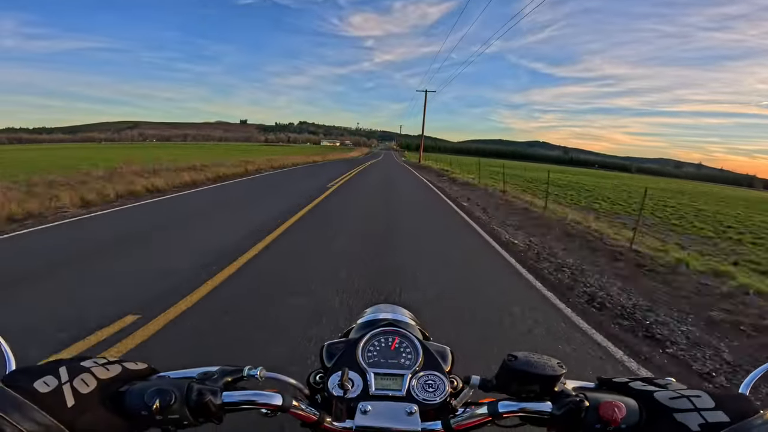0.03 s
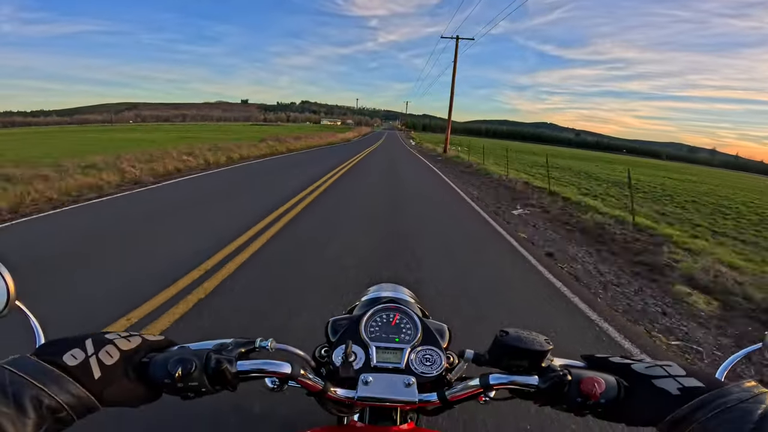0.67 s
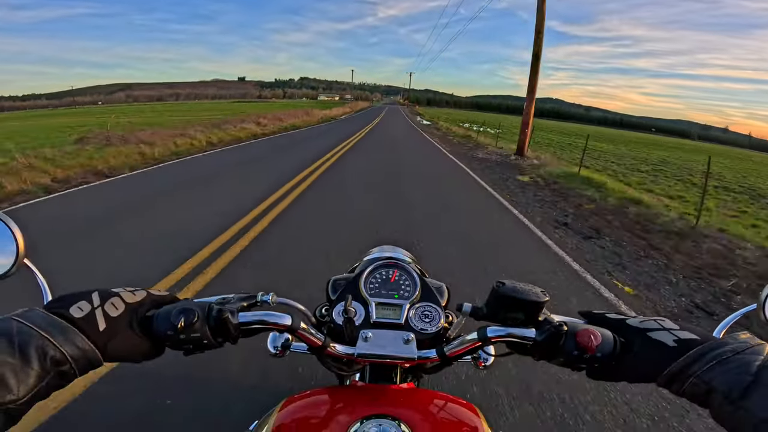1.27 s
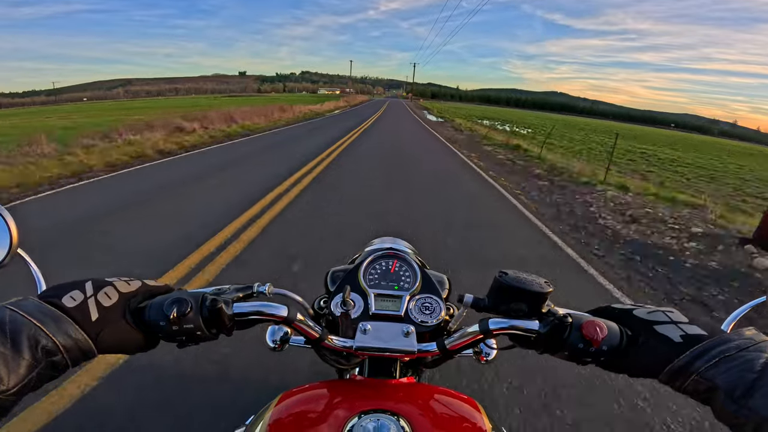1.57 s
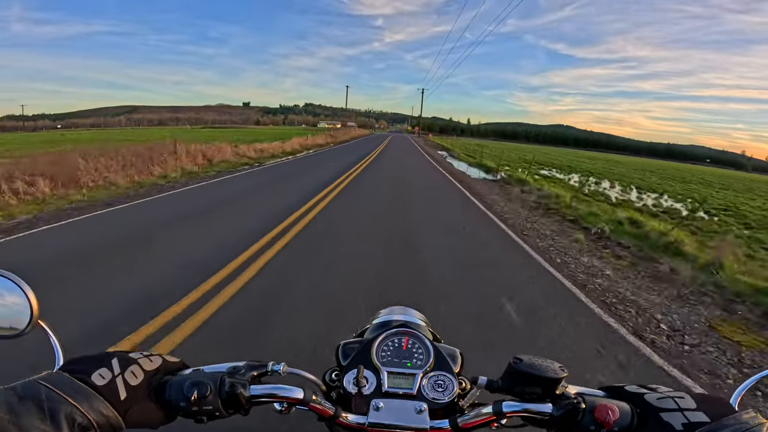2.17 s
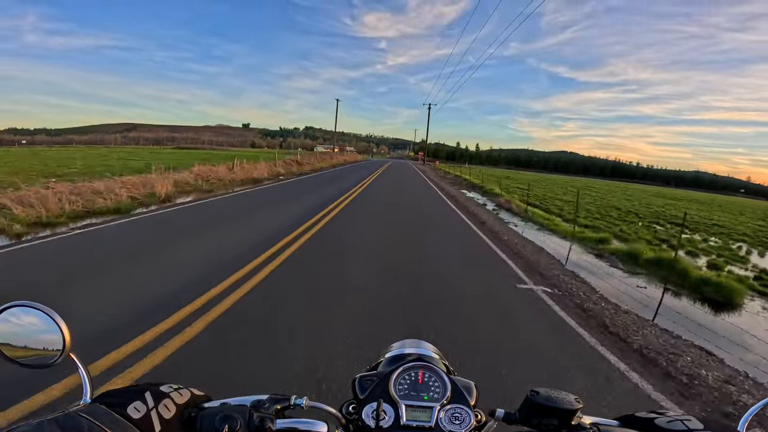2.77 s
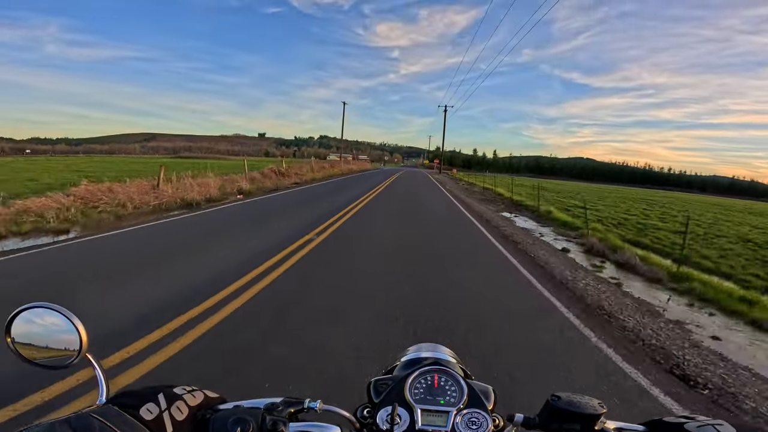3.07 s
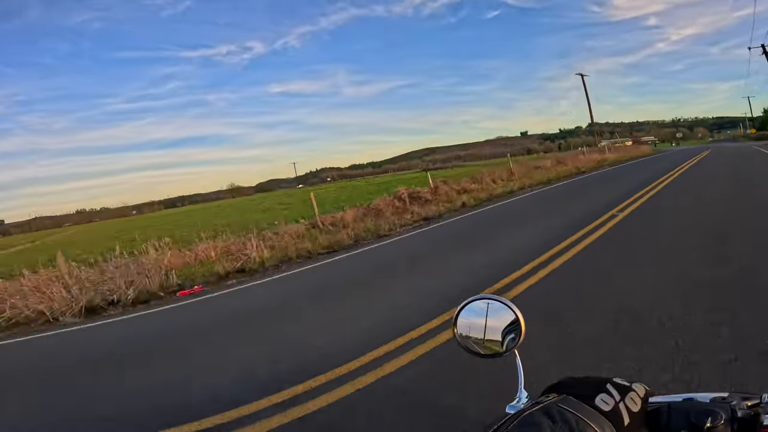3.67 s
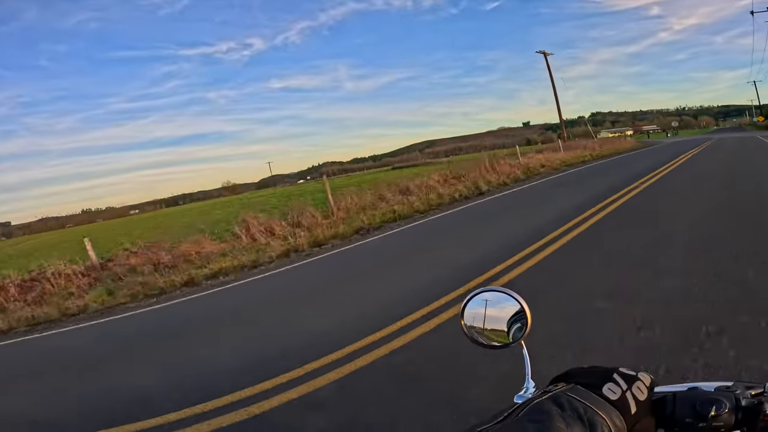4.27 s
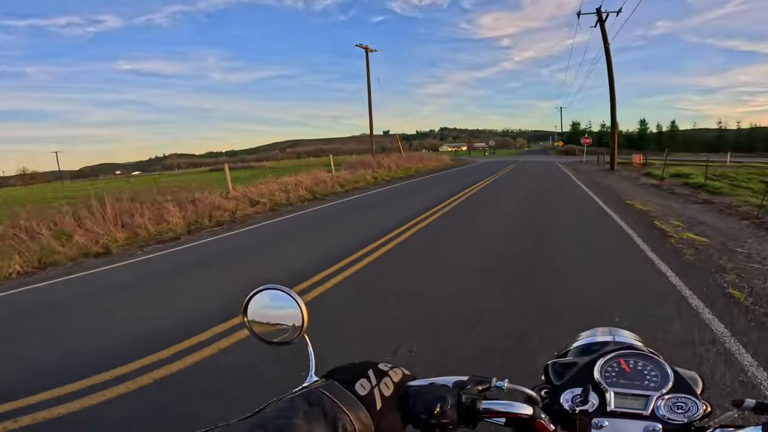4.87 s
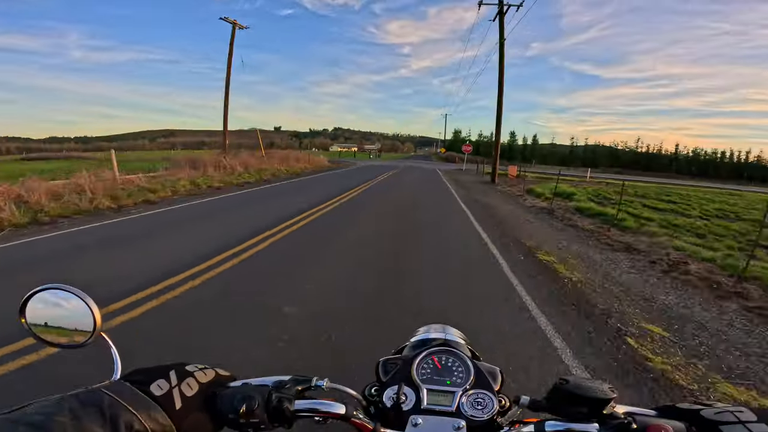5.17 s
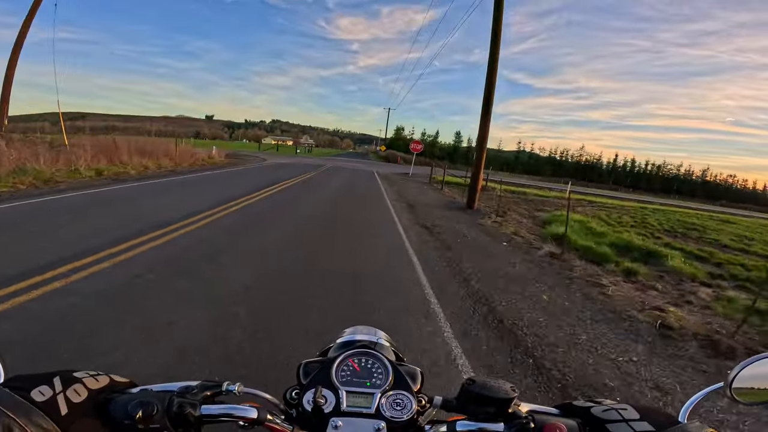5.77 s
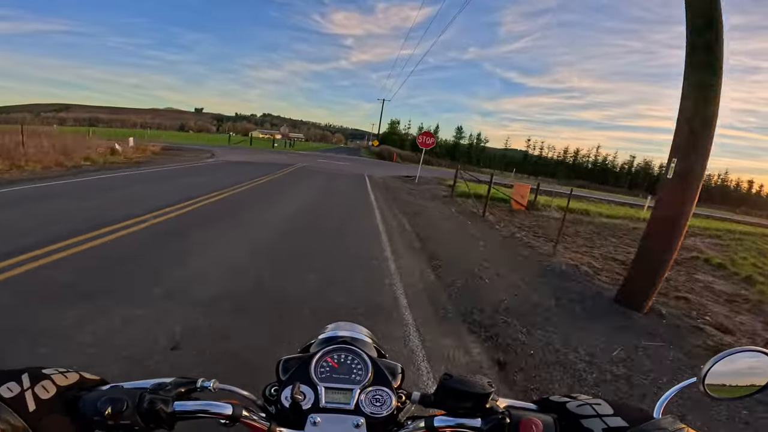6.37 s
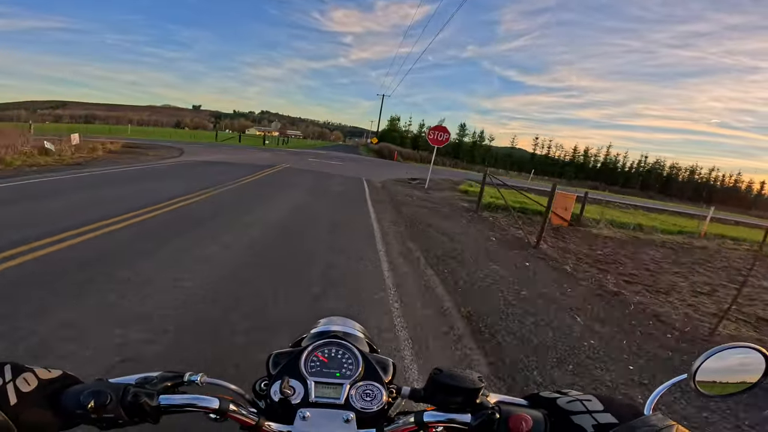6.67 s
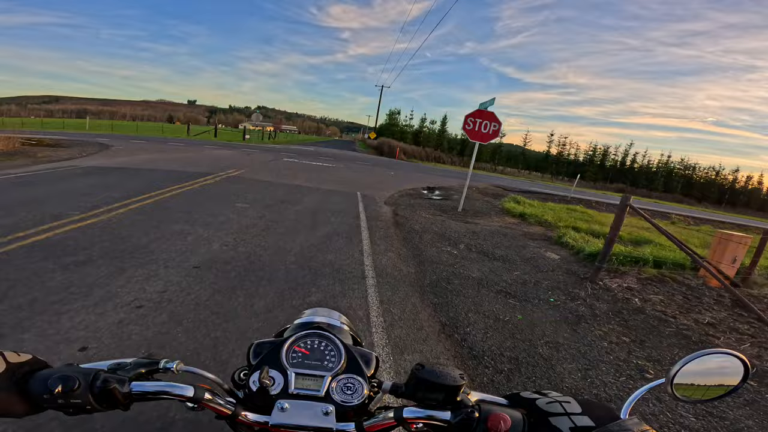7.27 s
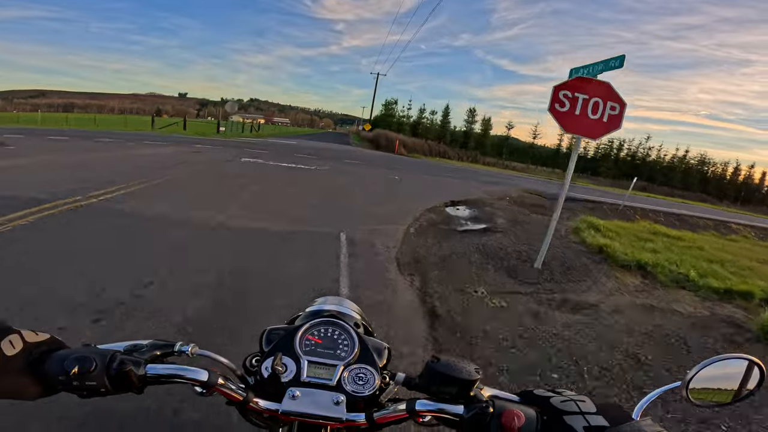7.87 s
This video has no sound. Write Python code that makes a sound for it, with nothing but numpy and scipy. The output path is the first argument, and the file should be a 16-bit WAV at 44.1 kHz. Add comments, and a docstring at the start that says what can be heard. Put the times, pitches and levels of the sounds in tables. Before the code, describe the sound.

A single-cylinder motorcycle coasts along an open road, heard from the rider's helmet under heavy, buffeting wind with faint whistles. Small touches of throttle lift the engine note at each downshift, and gears whine faintly. As the bike slows, the wind dies away and the engine falls in pitch. A lever clacks sharply, lighter clicks and a few soft exhaust pops follow, and the engine settles into a slow thumping idle.

```python
"""A single-cylinder motorcycle, heard from the rider's helmet, rolls off towards a stop sign.
At first turbulent wind buffets, rushes and whistles over the coasting engine, whose gas pulses ring
the silencer. A touch of throttle marks each downshift and meshing gears whine. The rider looks aside,
the brake rubs and the wind dies away with road speed. Then the clutch linkage scrapes, levers clack,
unburnt mixture pops in the silencer, and the engine catches into a slow thumping idle."""
import sys
import numpy as np
from scipy import signal
from scipy.io import wavfile

SR = 44100
rng = np.random.default_rng(int(sys.argv[2]) if len(sys.argv) > 2 else 0)


def unload_wav(signal):
    """Save mono or channel-first audio to the path in sys.argv[1] as 16-bit WAV at rate SR, clipped to [-1, 1]."""
    wavfile.write(
        sys.argv[1],
        SR,
        np.round(np.clip(np.atleast_2d(signal).T, -1, 1) * 32767).astype(np.int16),
    )


N = 357651
TIME = np.arange(N) / SR

# Spectra give relative level per unit bandwidth; sigma is the width of a Gaussian swell in time.
# road speed, coasting and then braking: t/s, speed/(m/s)
ROAD_SPEED = [(0, 20), (2.6, 19), (4.6, 15.5), (5.6, 12.9), (8.11, 6.6)]
# spectra of the wind's low buffeting, mid rush and high hiss: f/Hz, level/dB
BUFFET_SPECTRUM = [(15, -1), (28, -3), (50, -0.5), (90, 7.5), (150, -2.5), (250, -9), (400, -16)]
RUSH_SPECTRUM = [(120, 8.5), (220, 4), (330, 2.5), (450, -1), (580, -3.5), (720, 1), (1050, -6.5),
                 (1450, -5.5), (1900, -23), (2600, -37.5)]
HISS_SPECTRUM = [(1500, -9), (1900, 0.5), (2500, -0.5), (3200, -2.5), (4300, -8), (5200, -14),
                 (7400, -17.5), (10000, -26), (15500, -29)]
# helmet edges singing in the wind: f/Hz, bandwidth/Hz, level/dB relative to the rush
HELMET_MODES = [(780, 170, -9.5), (962.4, 31, -19.5)]
# visor whistles: f/Hz, bandwidth/Hz, relative level/dB
VISOR_MODES = [(5530, 580, -1.5), (7130, 720, -3)]
# gusts: t/s, sigma/s, rumble gain/dB, hiss gain/dB, whistle level/dB
GUSTS = [(.12, 0.14, 3, -0.5, -54), (.86, 0.08, 3.5, 2, -44), (1.12, 0.13, -6, 2.5, -47),
         (1.45, 0.079, 3, 2, -45), (1.67, 0.074, -3, 2, -43.5), (2.0, .1, 4.5, 1, -58)]
# brake disc resonances: f/Hz, bandwidth/Hz, relative level/dB
DISC_MODES = [(1648, 200, 6), (3375, 430, -7), (4750, 800, -15.5), (7000, 770, -23.5)]
# swells of a drive-train whine whose pitch falls with road speed: t/s, sigma/s, level/dB
DRIVE_WHINE_SWELLS = [(4.5, 0.16, -38), (5.25, 0.25, -49)]
# gear pairs under load: meshings per engine cycle, t/s, sigma/s, level/dB
GEAR_MESHES = [(30, 1.2, .25, -41), (30, 2.8, .12, -45), (41, 4.78, .12, -44), (48.5, 4.78, .1, -45),
               (52, 5.28, .15, -48), (80, 5.2, .15, -60), (71.5, 6.05, .13, -47), (70.5, 6.48, .08, -42)]
# lever and linkage impacts: t/s, knock level/dB, rattle level/dB, T60/s
CLACKS = [(6.2304, -42, -30.5, 0.027), (6.242, -35, -30, 0.049), (6.256, -18, -28, 0.015),
          (6.331, -44, -37, .04), (6.338, -55, -37, 0.11), (6.42, -45, -35, .035), (6.449, -41, -44, 0.11),
          (6.529, -45, -43, 0.17), (6.675, -30, -54, .05), (6.842, -39, -58, .025), (7.198, -53, -54, .03),
          (7.209, -55, -43, 0.015), (7.504, -44, -38.5, 0.03), (7.507, -31.5, -62, 0.097),
          (7.574, -41, -60, .08), (7.709, -44, -72, 0.06)]
# spectra of a lever's knock and of the linkage's scrape: f/Hz, level/dB
KNOCK_SPECTRUM = [(500, -20.5), (900, 15), (1400, 7.5), (2300, -25), (3600, -4.5), (6000, -28),
                  (12000, -40)]
SCRAPE_SPECTRUM = [(1500, 1.5), (2800, 4), (3800, -2.5), (4900, 4.5), (7000, -12), (8800, -6.5),
                   (12000, -18), (15500, -19)]
# steel linkage resonances: f/Hz, bandwidth/Hz, relative level/dB
LINKAGE_MODES = [(3400, 340, -16.5), (4700, 370, -13), (5500, 650, -12), (7230, 700, -20.5),
                 (8640, 730, -17.5), (11300, 2000, -26), (14000, 2500, -25.5)]
# clutch linkage scraping, hardest in mid-travel: t/s, sigma/s, level/dB
SCRAPES = [(6.22, 0.072, -58.5), (6.43, 0.062, -49), (6.85, 0.24, -66.5)]
# unburnt mixture popping around the time the engine catches: t/s, level/dB
POPS = [(6.787, -32), (7.049, -30), (7.281, -30)]
# ring of the pops in the silencer: f/Hz, bandwidth/Hz, relative level/dB
POP_MODES = [(367, 120, -3), (507, 160, -14)]
# spectrum of the valve gear and crankcase: f/Hz, level/dB
CLATTER_SPECTRUM = [(150, 6), (240, 9), (300, 1), (370, 12), (470, 0), (580, -8.5), (900, -9.5),
                    (1050, -18.5), (1700, -10), (2100, -28.5), (2900, -36), (3400, -26), (5500, -33.5),
                    (9000, -48), (15000, -52)]
# course of their clatter: t/s, level/dB
CLATTER_LEVEL = [(0, -42), (4, -37.5), (5.5, -31), (6.5, -34), (7.2, -38.5), (8.11, -41.5)]
# engine speed, rising at each downshift and sinking to idle: t/s, four-stroke cycle rate/Hz
CYCLE_RATE = [(0.0, 35.79), (0.24, 34.02), (1.24, 32.58), (2.15, 30.08), (2.36, 32.81), (2.61, 31.1),
              (2.81, 33.1), (3.86, 28.43), (3.97, 29.1), (4.25, 26.25), (4.52, 26.15), (4.84, 29.99),
              (5.3, 27.38), (6.52, 18.66), (6.89, 15.26), (7.22, 13.22), (7.37, 11.61), (8.11, 9.27)]
# weak cycles around the catch: t/s, fraction of the charge lost
STUMBLES = [(7.0, 0.3), (7.29, 0.5)]
# touches of throttle: opening t/s, closing t/s, fraction open, exhaust gain/dB
THROTTLE_TOUCHES = [(-.2, 0.846, 0.57, 1.5), (2.17, 2.483, 0.93, -2), (3.87, 4.044, 0.52, 2),
                    (4.194, 4.247, 0.5, 2.5), (4.66, 5.15, 0.21, 1.5)]
# course of the exhaust's loudness: t/s, gain/dB
EXHAUST_GAIN = [(0, -5), (1.5, -5), (2.7, -3.5), (4.4, -2.5), (5.8, -2.2), (6.8, -3.5), (7.4, -3.5),
                (8.11, -5.5)]
# resonances of the silencer and of the air box: f/Hz, bandwidth/Hz, gain/dB
SILENCER_MODES = [(85.6, 49.2, 2.5), (133.4, 32.4, 2), (237.3, 32, -2.5), (414, 91, -6)]
AIR_BOX_MODES = [(153.2, 15.4, 8.5), (262, 29, -12)]

CATCH_S, FIRED_CHARGE = 7.18, 1.39   # firing begins; a fired cycle's blow against an unfired suck of 1
# wind layers: base level at the starting speed, and the power of speed that the amplitude follows
BUFFET_DB, BUFFET_POWER = -17.5, 2.33
RUMBLE_DB, RUMBLE_POWER = -23, .9
RUSH_DB, RUSH_POWER = -24.5, 2.25
HISS_DB, HISS_POWER = -42, 4.7


def from_db(db):
    """Amplitude ratio of a level in decibels."""
    return 10 ** (np.asarray(db) / 20)


def unit_rms(x):
    """Normalisation to unit mean power."""
    return x / np.sqrt(np.mean(x ** 2) + 1e-20)


def in_time(rows):
    """Linear interpolation of (t/s, value) rows at every sample."""
    return np.interp(TIME, *np.transpose(rows))


def bell(x, sigma):
    """Gaussian pulse of height 1 centred on zero."""
    return np.exp(-.5 * (x / sigma) ** 2)


def swells(rows):
    """Superposition of Gaussian envelopes given as (t/s, sigma/s, level/dB)."""
    return sum(from_db(db) * bell(TIME - at, sigma) for at, sigma, db in rows)


def held(start_s, end_s, attack_s, release_s):
    """Trapezoidal envelope with ramps centred on its start and end."""
    return np.clip(np.minimum((TIME - start_s) / attack_s, (end_s - TIME) / release_s) + .5, 0, 1)


def drift(corner_hz):
    """Random fluctuation: low-passed Gaussian noise of unit rms."""
    step, settle = 40, 2000
    pole = np.exp(-2 * np.pi * corner_hz * step / SR)
    white = rng.standard_normal(N // step + settle + 2)
    slow = signal.lfilter([1], [1, -2 * pole, pole * pole], white)[settle:]
    return np.interp(np.arange(N) / step, np.arange(len(slow)), unit_rms(slow))


def resonate(x, hz, width):
    """Second-order resonator with unit gain at its peak."""
    return signal.lfilter(*signal.iirpeak(hz, hz / width, fs=SR), x + 1e-18)


def modal_noise(modes):
    """Random excitation of modes: each filters its own noise twice, for steep skirts."""
    return sum(from_db(db) * unit_rms(resonate(resonate(rng.standard_normal(N), hz, width), hz, width))
               for hz, width, db in modes)


def banded_noise(spectrum, flicker_db):
    """Independent amplitude modulation of 0.4-octave noise bands; unit rms in sum."""
    hz, level = np.transpose(spectrum)
    edges = 14 * 2 ** np.arange(0, 10.5, .4)
    white, out = rng.standard_normal((2, N)), 0
    for k, (low, high) in enumerate(zip(edges, edges[1:])):
        if high > hz[0] and low < hz[-1]:
            band = signal.sosfilt(signal.butter(2, [low, high], "band", fs=SR, output="sos"), white[k % 2])
            centre_db = np.interp(np.log(low * high) / 2, np.log(hz), level)
            out = out + band * from_db(centre_db + flicker_db * drift(36))
    return unit_rms(out)


def edge_tone(hz=2940, width_hz=90, waver_hz=64.8):
    """Edge tone at the helmet: narrow-band noise whose pitch wavers with the eddies; unit rms."""
    phase = 2 * np.pi * np.cumsum(hz + waver_hz * drift(9)) / SR
    return unit_rms(drift(width_hz) * np.sin(phase) + drift(width_hz) * np.cos(phase))


def wind(speed, visor_db=-63):
    """Flow noise: turbulent pressure at the helmet follows power laws of speed, modulated by eddies."""
    speed_db = 20 * np.log10(speed / speed[0])
    eddies = drift(25)
    # looking aside trades rumble for hiss and sets the visor whistling
    aside = held(3.28, 4.95, attack_s=.25, release_s=1.0)
    rumble_db = RUMBLE_DB + RUMBLE_POWER * speed_db - 7.5 * aside
    hiss_db = HISS_DB + HISS_POWER * speed_db + 4 * aside
    whistle_gain = 0
    for at, sigma, more_rumble_db, more_hiss_db, whistle_db in GUSTS:
        gust = bell(TIME - at, sigma)
        rumble_db += more_rumble_db * gust
        hiss_db += more_hiss_db * gust
        whistle_gain += from_db(whistle_db) * gust
    buffet_db = BUFFET_DB + BUFFET_POWER * speed_db + 1.2 * eddies
    rush_db = RUSH_DB + RUSH_POWER * speed_db + .58 * eddies
    buffet = from_db(buffet_db) * banded_noise(BUFFET_SPECTRUM, flicker_db=1)
    rumble = from_db(rumble_db) * banded_noise([(18, -3), (30, -1), (50, -2)], flicker_db=2)
    rush = from_db(rush_db) * (banded_noise(RUSH_SPECTRUM, flicker_db=1) + modal_noise(HELMET_MODES))
    hiss = from_db(hiss_db + .29 * eddies) * banded_noise(HISS_SPECTRUM, flicker_db=1)
    whistle = whistle_gain * from_db(2.8 * drift(15)) * edge_tone()
    visor = from_db(visor_db) * aside * modal_noise(VISOR_MODES)
    return buffet + rumble + rush + hiss + whistle + visor


def brake(on_s=4.4, off_s=7.08, bite_db=-58, squeeze_db_per_s=2, drag_db=-63.5):
    """Friction excites the disc's modes, louder as the squeeze grows; the pad then drags on lightly."""
    squeeze_db = bite_db + squeeze_db_per_s * (TIME - on_s)
    squeeze = held(on_s, off_s, attack_s=.5, release_s=.047) * from_db(squeeze_db)
    drag = from_db(drag_db) * (TIME > on_s)
    return np.maximum(squeeze, drag) * from_db(drift(15)) * modal_noise(DISC_MODES)


def drive_whine(speed, cycles_per_m=60.5):
    """Rotational tone of the drive train: a wavering whine, its pitch proportional to road speed."""
    phase = 2 * np.pi * np.cumsum(cycles_per_m * speed) / SR
    envelope = swells(DRIVE_WHINE_SWELLS) * from_db(3 * drift(12))
    return np.sqrt(2) * envelope * np.sin(phase + .7 * drift(18))


def gear_whine(turned, wobble_rad=.7, flutter_db=2.5):
    """Tooth-meshing tones at multiples of the cycle rate swell as the load passes over each gear pair."""
    out = 0
    for meshings, at, sigma, db in GEAR_MESHES:
        tone = np.sqrt(2) * np.sin(2 * np.pi * meshings * turned + wobble_rad * drift(22))
        out = out + tone * bell(TIME - at, sigma) * from_db(db + flutter_db * drift(6.3))
    return out


def levers(rise_s=.00036):
    """Impacts leave a dull knock and a steely rattle that decay exponentially; sliding friction scrapes."""
    knock, rattle = np.zeros((2, N))
    for at, knock_db, rattle_db, t60 in CLACKS:
        start = int(at * SR)
        age = TIME[:N - start]
        envelope = np.minimum(age / rise_s, 1) * np.exp(-np.log(1000) * np.minimum(age / t60, 10))
        knock[start:] += from_db(knock_db) * envelope
        rattle[start:] += from_db(rattle_db) * envelope
    knock *= banded_noise(KNOCK_SPECTRUM, flicker_db=2)
    rattle *= modal_noise(LINKAGE_MODES)
    scrape = swells(SCRAPES) * banded_noise(SCRAPE_SPECTRUM, flicker_db=4.5)
    return knock + rattle + scrape


def pops(sigma_s=.01):
    """Afterfire: unburnt mixture makes short, dull bursts of noise in the silencer's resonances."""
    return swells([(at, sigma_s, db) for at, db in POPS]) * modal_noise(POP_MODES)


def valve_gear(since, period):
    """Impact noise: a steady mechanical clatter peaks as the valves open and as they seat."""
    opening = 1.4 * bell(since + .003, .0012)
    seating = bell(since - .44 * period, .0012)
    clatter = (1 + opening + seating) * banded_noise(CLATTER_SPECTRUM, flicker_db=2.5)
    return from_db(in_time(CLATTER_LEVEL)) * unit_rms(clatter)


def crank(start_cycles=.359, lead_s=.011):
    """Phase as the integral of cycle rate; each whole turn of it opens the exhaust valve."""
    turned = start_cycles + np.cumsum(in_time(CYCLE_RATE)) / SR
    opens = np.r_[-start_cycles / CYCLE_RATE[0][1], np.interp(np.arange(1, turned[-1]), turned, TIME)]
    period = np.r_[np.diff(opens), opens[-1] - opens[-2]]
    # a cycle is counted from just before its valve opens, so its first pulse rises smoothly
    cycle = np.clip(np.searchsorted(opens - lead_s, TIME) - 1, 0, len(opens) - 1)
    since = TIME - opens[cycle]
    charge = np.where(opens < CATCH_S, -1., FIRED_CHARGE)   # unfired sucks, fired blows
    for at, lost in STUMBLES:
        charge[np.argmin(np.abs(opens - at))] *= 1 - lost
    return turned, cycle, since, period[cycle], charge[cycle]


def twist_grip(wrist_s=.1):
    """Load control: each roll of the wrist ramps the throttle opening and the exhaust gain."""
    throttle, exhaust_db = 0, in_time(EXHAUST_GAIN)
    for start, end, opening, gain_db in THROTTLE_TOUCHES:
        touch = held(start, end, wrist_s, wrist_s)
        throttle += opening * touch
        exhaust_db += gain_db * touch
    return np.clip(throttle, 0, 1), exhaust_db


def engine(cycle, since, period, charge, uneven=.01, rasp=.027):
    """Source and filter: each cycle's gas pulses drive the resonances of the silencer and air box."""
    throttle, exhaust_db = twist_grip()
    fired = np.clip(charge, 0, 1)
    flow_strength, fill = 1 + uneven * rng.standard_normal((cycle[-1] + 1, 2))[cycle].T
    puff_s = .0008 + .006 * period   # a slow cam opens its valves slowly, so the puffs lengthen
    blowdown = 1.13 * (charge - .12 * fired + 1.23 * throttle * fill) * bell(since, puff_s)
    # the piston's sweep grows with its speed and fades once the engine fires
    sweep = .013 / period * bell(since / period - .169, .027) * (1 - .13 * throttle) * (1 - fired)
    # both valves stand open together
    overlap = .55 * bell(since - .2422 * period - .0021 * fired, .82 * puff_s)
    overlap *= (1 - .3 * throttle) * (1 + .17 * fired)
    turbulence = unit_rms(signal.lfilter([1], [1, -.95], rng.standard_normal(N)))
    flow = (overlap - blowdown - sweep) * flow_strength * (1 + rasp * turbulence)
    exhaust = sum(from_db(db) * resonate(flow, hz, width) for hz, width, db in SILENCER_MODES)
    # a narrow dip at 29 Hz softens the engine's deepest throb; the packing absorbs the treble
    exhaust -= .5 * resonate(exhaust, hz=29, width=10)
    exhaust = signal.sosfilt(signal.butter(2, 1100, fs=SR, output="sos"), exhaust)
    gulp = throttle * fill * bell(since - .25 * period, .001)
    intake = sum(from_db(db) * resonate(gulp, hz, width) for hz, width, db in AIR_BOX_MODES)
    return from_db(exhaust_db) * exhaust + intake


def scene():
    """Superposition of machine and wind at the helmet, in one channel."""
    turned, cycle, since, period, charge = crank()
    speed = in_time(ROAD_SPEED)
    motor = engine(cycle, since, period, charge) + valve_gear(since, period)
    bike = motor + gear_whine(turned) + drive_whine(speed) + brake() + levers() + pops()
    return (bike + wind(speed))[None]


def record(dry):
    """Soft saturation rounds the highest peaks; a steep low-pass cuts the top."""
    ceiling, cutoff_hz = .85, 15800
    rounded = dry / (1 + (np.abs(dry) / ceiling) ** 6) ** (1 / 6)
    return signal.sosfilt(signal.ellip(10, .1, 80, cutoff_hz, fs=SR, output="sos"), rounded)


dry = scene()
out = record(dry)
unload_wav(out)
```